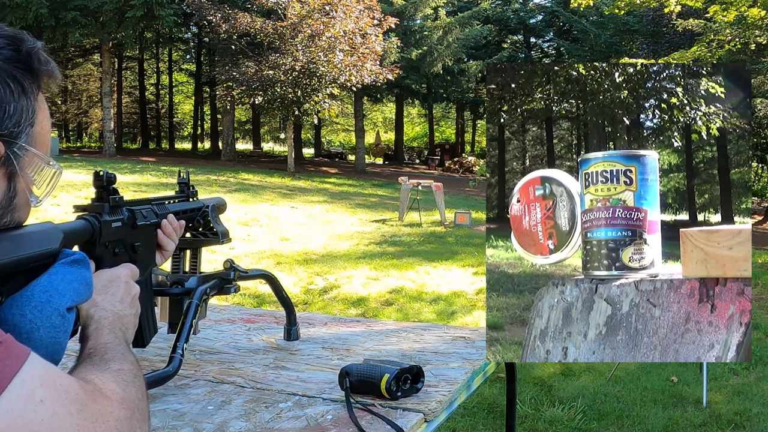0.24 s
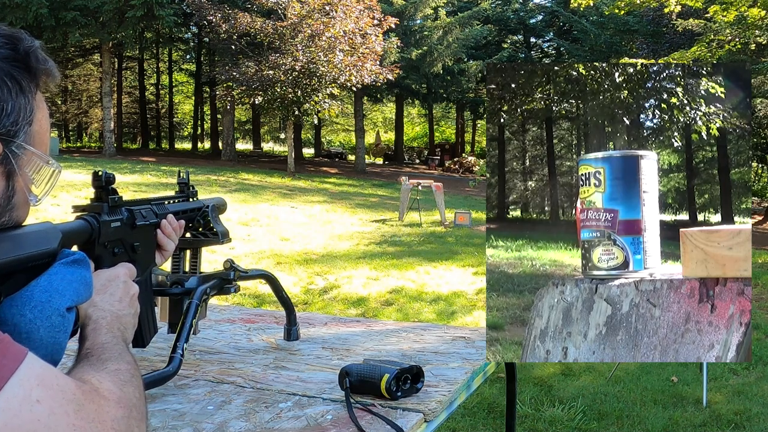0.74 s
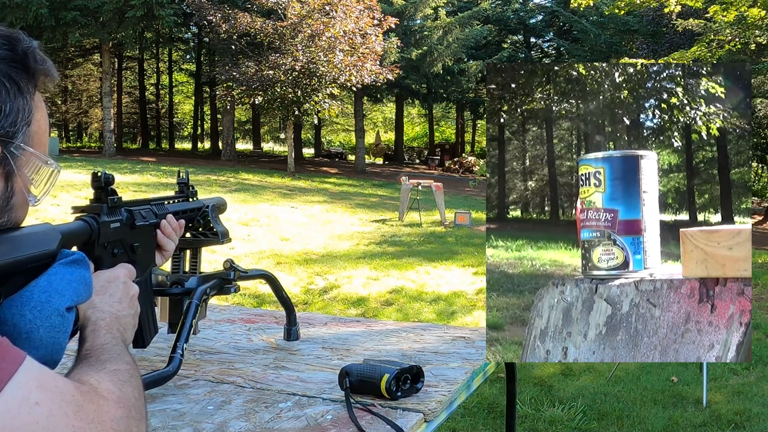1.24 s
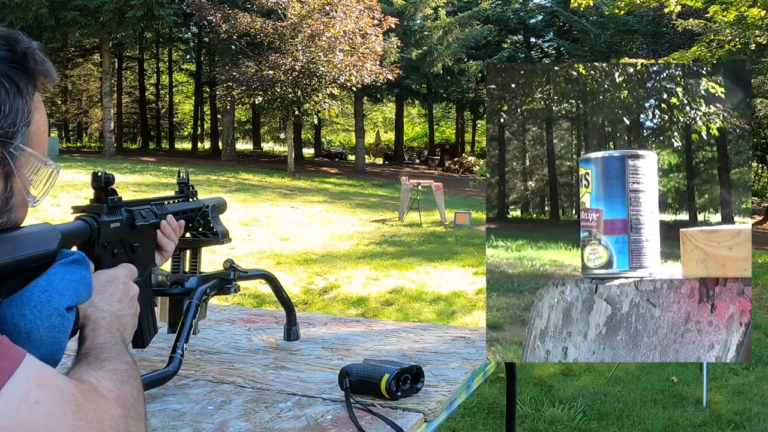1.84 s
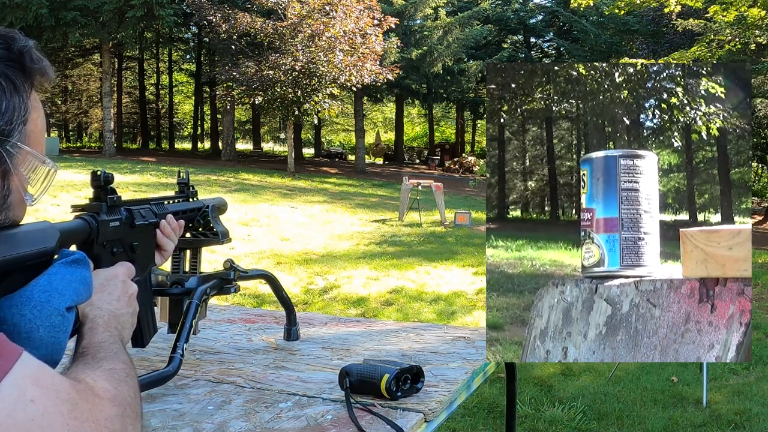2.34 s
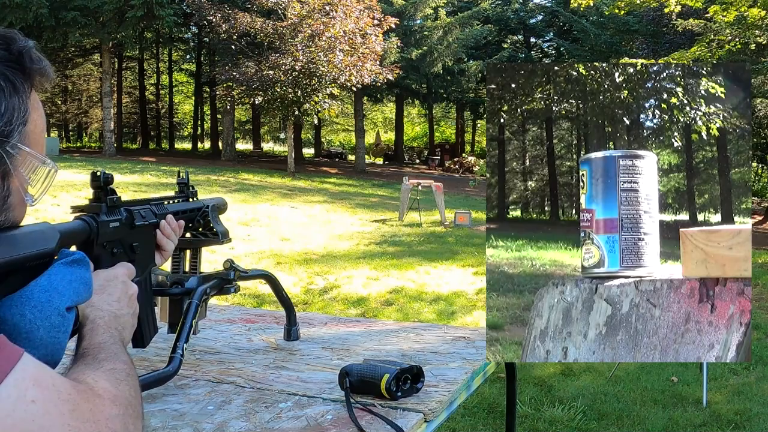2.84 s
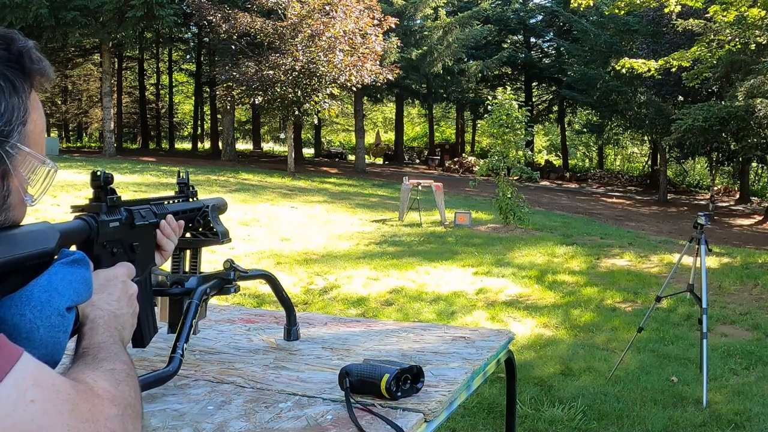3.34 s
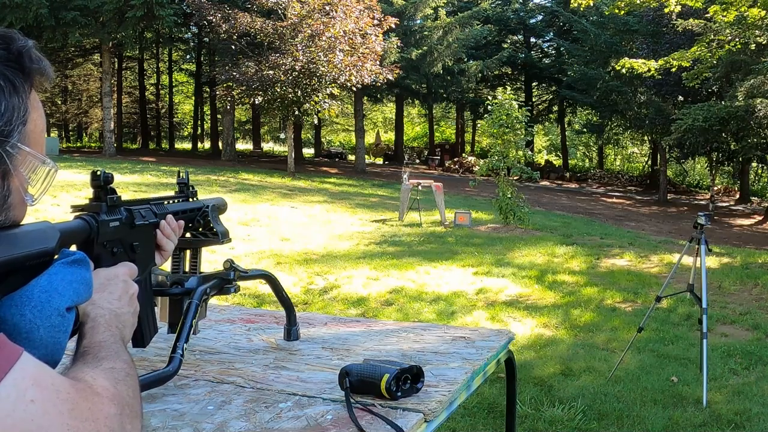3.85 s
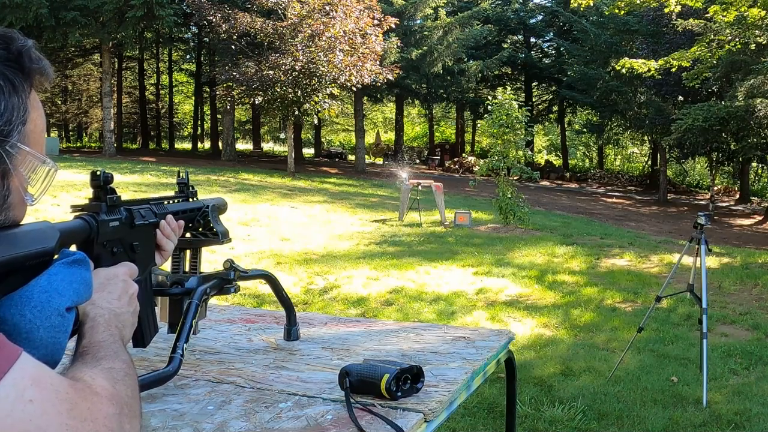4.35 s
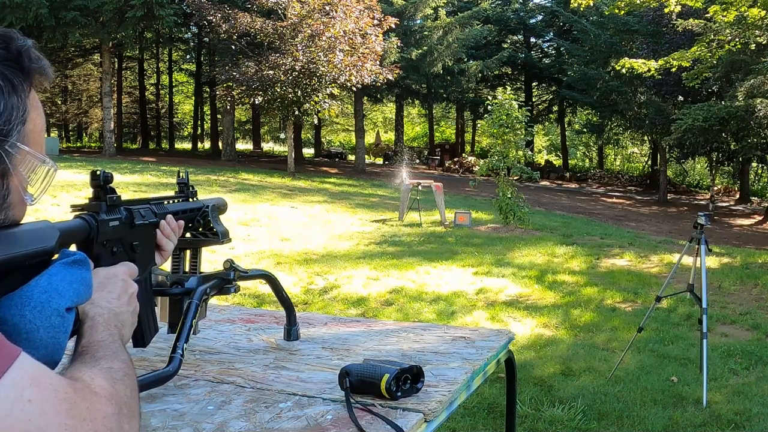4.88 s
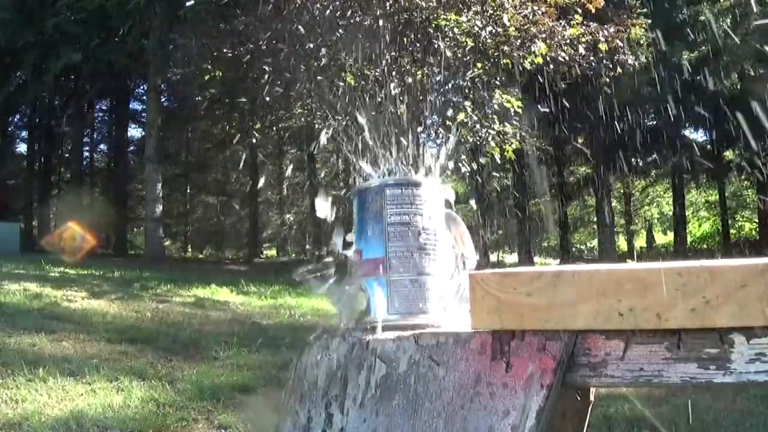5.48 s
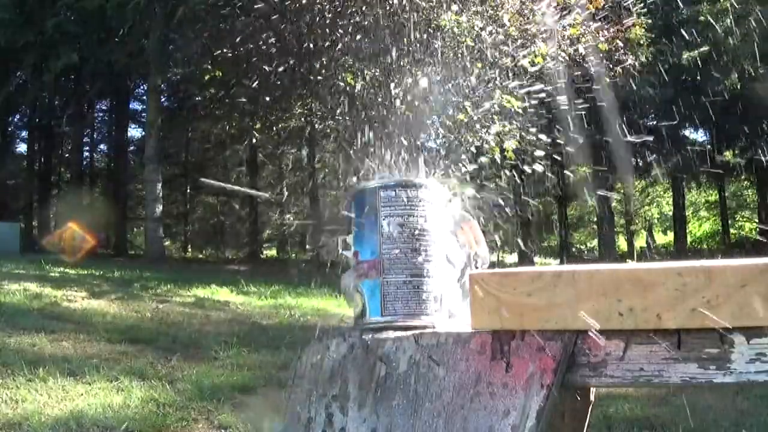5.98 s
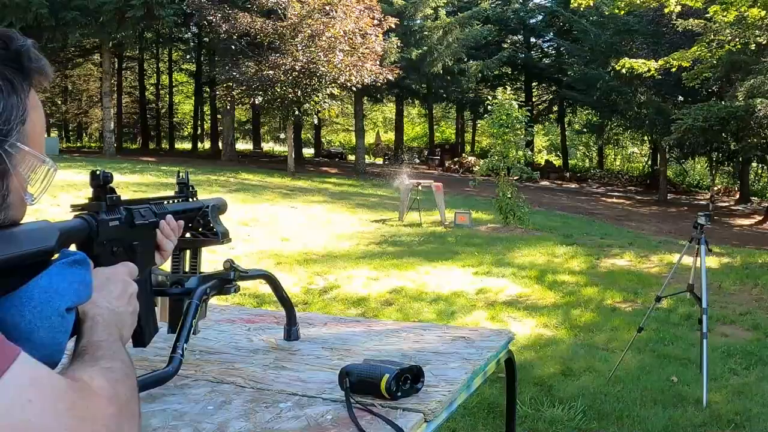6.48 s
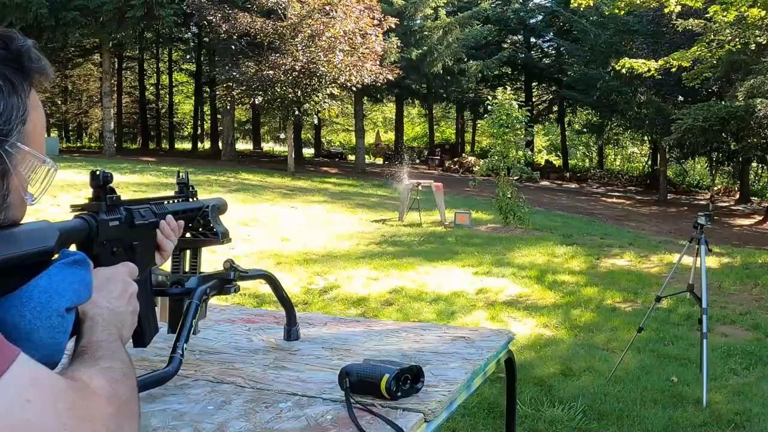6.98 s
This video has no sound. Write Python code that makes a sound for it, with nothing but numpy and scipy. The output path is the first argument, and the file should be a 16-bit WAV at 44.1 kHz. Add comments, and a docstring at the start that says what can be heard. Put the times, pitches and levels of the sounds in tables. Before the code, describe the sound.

A motor-driven air rifle fires two short bursts, then a long rapid string outdoors, gears whirring and pellets ticking on a can.

```python
"""A motor-driven air rifle on a table fires two short bursts, then a long string, at a can across a lawn.
Gears whirr and wind the spring; ten times a second the action clacks or air cracks from the muzzle.
Pellets tick on the food can, which answers with hollow notes. A small metal part pings in a pause,
a cricket trills, and trees scatter the sound back. The last 0.8 s repeats part of the long string."""
import sys
import numpy as np
from scipy import signal
from scipy.fft import rfft, irfft, next_fast_len
from scipy.io import wavfile
from scipy.ndimage import uniform_filter1d, minimum_filter1d

SR = 44100
rng = np.random.default_rng(int(sys.argv[2]) if len(sys.argv) > 2 else 0)


def wav_out(sig):
    """Save sig, one row per channel (or a flat mono array), as 16-bit PCM at SR to the path in sys.argv[1]."""
    wavfile.write(sys.argv[1], SR, np.round(np.clip(np.atleast_2d(sig).T, -1, 1) * 32767).astype(np.int16))


N = 318402
TIME = np.arange(N) / SR


def amp(db):
    """Decibels to gain."""
    return 10 ** (np.asarray(db) / 20)


def unit_rms(x):
    """Scale to rms 1."""
    return x / np.sqrt(np.mean(x ** 2) + 1e-20)


def wobble(smooth_samples, size=N):
    """Smoothed random curve, rms 1."""
    return unit_rms(uniform_filter1d(rng.standard_normal(size), smooth_samples))


def at_hz(table, hz):
    """Interpolate a table over log frequency."""
    knots_hz, values = np.transpose(table)
    return np.interp(np.log(hz + 1), np.log(knots_hz + 1), values)


def add(mix, start_s, sound):
    """Mix a sound in at start_s."""
    part = mix[..., round(start_s * SR):][..., :sound.shape[-1]]
    part += sound[..., :part.shape[-1]]


# Stereo width: freq_hz, side_db
STEREO_WIDTH = [(50, -33), (200, -22.5), (500, -9), (1000, -12), (2500, -10.5), (5000, -8.5), (9000, -16),
                (14000, -40.5)]

def noise(colour, size=N):
    """Stereo noise, rms 1; colour rows are freq_hz, density_db."""
    hz = np.fft.rfftfreq(size, 1 / SR)
    mid, side = rfft(rng.standard_normal((2, size))) * amp(at_hz(colour, hz))
    side = side * amp(at_hz(STEREO_WIDTH, hz))
    return unit_rms(irfft(np.array([mid + side, mid - side]), size))


def burst(colour, rise_s, decay_s, size=8192):
    """Coloured noise that rises to rms 1 and decays."""
    t = np.arange(size) / SR
    envelope = (1 - np.exp(-t / rise_s)) * np.exp(-t / decay_s)
    return noise(colour, size) * envelope / envelope.max()


# Echo colour: freq_hz, gain_db
ECHO_COLOUR = [(100, -9), (400, -6.5), (900, -21), (1350, -8), (2100, -6.5), (4500, -6.5), (9500, -3),
               (14000, -16)]
# Echo decay: freq_hz, t60_s
ECHO_DECAY = [(100, 0.72), (400, 0.51), (2000, 1.21), (4000, 0.94), (8000, 0.64), (14000, 0.6)]

def tree_echo(x, blur_octaves=0.2, build_s=0.019, flutter_db=2.5):
    """Trunks scatter sound into a fluttering wash that builds and decays in each band."""
    hz, t, spectrum = signal.stft(x.mean(0), SR, nperseg=512)
    octave, lag_s = np.log2(hz + 1), t[t < 1]
    blur = np.exp(-0.5 * ((octave[:, None] - octave) / blur_octaves) ** 2)
    power = (blur / blur.sum(1, keepdims=True)) @ abs(spectrum) ** 2
    decay = (amp(-60 * lag_s / at_hz(ECHO_DECAY, hz)[:, None]) * (1 - np.exp(-lag_s / build_s))) ** 2
    tail = np.sqrt(abs(signal.fftconvolve(power, decay / decay.sum(1).mean(), axes=1)[:, :len(t)]))
    wash = signal.stft(rng.standard_normal((2, N)), SR, nperseg=512)[2]
    patches = uniform_filter1d(uniform_filter1d(rng.standard_normal(tail.shape), 3), 25, axis=0)
    flutter = unit_rms(amp(flutter_db * unit_rms(patches)))
    wash = wash / wash.std() * flutter * tail * amp(at_hz(ECHO_COLOUR, hz))[:, None]
    wash[1] *= amp(at_hz(STEREO_WIDTH, hz) + 3.5)[:, None]
    mid, side = signal.istft(wash, SR, nperseg=512)[1][:, :N]
    return np.array([mid + side, mid - side])


# Still air: freq_hz, density_db
AIR_COLOUR = [(20, -27), (68, -2.5), (150, -4), (216, -10.5), (350, -16), (700, -19), (3200, -27),
              (8000, -33.5), (16000, -39)]

def still_air(level_db=-54):
    """Low rumble of air over the lawn."""
    return amp(level_db) * noise(AIR_COLOUR)


def cricket(level_db=-57, pitch_hz=2790, waver_hz=30, pulse_hz=29.9, swell_db=1.5, echo_db=-11):
    """A distant, wavering trill swells and fades, blurred by the trees."""
    swell, pace = wobble(12000), wobble(12000)
    strokes = np.cumsum(pulse_hz * (1 + 0.0082 * pace)) / SR
    pulses = np.maximum(np.sin(2 * np.pi * strokes), 0) ** 4
    cycles = np.cumsum(pitch_hz + waver_hz * wobble(250)) / SR
    trill = amp(level_db + swell_db * swell) * pulses * np.sin(2 * np.pi * cycles)
    return trill + amp(echo_db) * tree_echo(trill[None], blur_octaves=0.02)


# Air puffs: start_s, level_db
PUFFS = [(3.69, -25), (4.101, -22), (4.203, -12.5), (5.024, -27), (5.7398, -23.5), (6.048, -36)]

def air_thumps(push_s=0.0013, settle_s=0.0091, settle_db=-14, rumble_db=-21):
    """A puff pushes the microphone and sucks it back; pressure settles with a short rumble."""
    out, t = np.zeros((2, N)), np.arange(8192) / SR
    u, v = t / push_s, t / settle_s
    push = u * (1 - u / 2) * np.exp(-u)
    settle = v ** 2 * (1 - v / 4) * np.exp(-v)
    puff = push / push.max() + amp(settle_db) * settle / settle.max()
    for start_s, level_db in PUFFS:
        rumble = burst([(25, -6), (80, 10), (160, -16.5), (300, -14.5), (1000, -62)], 0.0032, 0.026)
        add(out, start_s, amp(level_db) * (puff * amp([[0.7], [-0.7]]) + amp(rumble_db) * rumble))
    return out


# Small metal part: pitch_hz, level_db, t60_s
PING_MODES = [(367, -6.5, 0.74), (1933, -4, 0.98), (2050, -1, 0.6), (2519, -1, 0.69), (2879, 1, 0.35),
              (2940, 1.5, .9), (3360, 1, 0.5), (3380, 9.5, 0.17), (3890, 13.5, 0.14), (4092, 0.5, 0.63),
              (4340, -1.5, 0.63), (5145, -5, 0.76), (5263, 4, 0.46), (5900, 1, 0.54), (6180, 2, 0.65),
              (6900, -0.5, 0.68), (7475, 2.5, 0.55), (7838, 0, 0.76), (8830, -4, 0.42), (10200, -3, 0.48)]

def metal_ping(start_s=2.592, ring_db=-42, clash_db=-28.5):
    """A struck part on the right: bright clash, then ringing modes, the higher ones more blurred."""
    out, t = np.zeros((2, N)), np.arange(SR) / SR
    for pitch_hz, level_db, t60_s in PING_MODES:
        linewidth_hz = (pitch_hz / 2000) ** 2
        wander = np.cumsum(rng.standard_normal(SR)) * np.sqrt(2 * np.pi * linewidth_hz / SR)
        phase = rng.uniform(0, 2 * np.pi) + wander + 0.22 * rng.standard_normal((2, 1))
        envelope = amp(ring_db + level_db - 60 * t / t60_s)
        add(out, start_s, envelope * np.sin(2 * np.pi * pitch_hz * t + phase))
    clash_colour = [(1200, -27), (2200, -9.5), (3900, -2.5), (7500, -4.5), (10500, -9.5), (15000, -33)]
    add(out, start_s, amp(clash_db) * burst(clash_colour, 0.0003, 0.031))
    return out * amp([[-1.3], [1.3]])


# Hiss swells: peak_s, level_db, half_width_s
HISS_SWELLS = [(.145, -31, 0.022), (0.173, -26, 0.0036), (0.286, -24.5, 0.0039), (0.451, -23, 0.011),
               (.495, -26, 0.015), (1.784, -27, 0.0088), (1.945, -27.5, 0.021), (1.998, -25, 0.01),
               (4.12, -24, 0.00714), (4.256, -25, 0.019), (5.565, -25.5, 0.024), (6.101, -24, 0.014)]
# Hiss: freq_hz, density_db
HISS_COLOUR = [(300, -31), (1500, -0.5), (3000, 4), (6000, 7), (9500, 4), (12000, -4), (16000, -19.5)]

def hiss(grain_db=2.5):
    """Brief swells of grainy hiss."""
    envelope = sum(amp(level_db) * np.exp(-0.5 * ((TIME - peak_s) / half_width_s) ** 2)
                   for peak_s, level_db, half_width_s in HISS_SWELLS)
    grain = unit_rms(amp(grain_db * wobble(40)))
    return envelope * grain * noise(HISS_COLOUR)


# Loud scrap ticks: start_s, level_db
LOUD_SCRAPS = [(3.707, -16), (3.7133, -13.5), (3.7243, -18.5), (3.8573, -13), (3.8621, -17), (3.8683, -16),
               (3.8746, -13), (4.1424, -13), (4.3143, -28), (4.7253, -17.5), (4.9243, -20.5),
               (5.5534, -13.5)]

def scraps(faint_count=200, faint_db=-35, spread_db=7, lag_s=0.027):
    """Flying scraps tick: a few loud, many faint after the shots of the long string."""
    out, long_string, faint = np.zeros((2, N)), SHOT_EVENTS[2:], []
    colour = [(400, -19), (4000, -14), (6500, -2.5), (10500, 12), (13000, 2.5), (16000, -12)]
    for which, late, loud in rng.random((faint_count, 3)):
        shot_s = long_string[int(which * len(long_string))][0]
        delay_s = lag_s * (0.5 - np.log(1 - late))
        faint.append((shot_s + delay_s, faint_db + spread_db * min(-np.log(1 - loud), 3)))
    for start_s, level_db in LOUD_SCRAPS + faint:
        add(out, start_s, amp(level_db) * burst(colour, 0.00005, 0.00062, size=512))
    return out


# Low can modes: pitch_hz, level_re_boom_db
CAN_MODES = [(226, -6), (305, 1.5), (365, -2), (465, -3), (739, -3)]
# Loud can notes: peak_s, level_db, pitch_hz, half_width_s
LOUD_NOTES = [(.475, -38, 348, .022), (.52, -36.5, 923, 0.014), (1.948, -24, 469, 0.0074),
              (1.95, -29, 341.7, 0.015), (3.737, -17.5, 309.6, 0.0046), (3.845, -24.5, 338, 0.0052),
              (3.935, -23.5, 303, 0.0091), (4.029, -20.5, 442.5, 0.0032), (4.053, -23.5, 950, .015),
              (4.13, -25.5, 964, 0.0076), (4.1806, -16.5, 434.6, 0.0023), (4.35, -31.5, 920, 0.027),
              (4.412, -30.5, 1125, 0.0044), (4.671, -12.5, 367.4, 0.003), (4.703, -20, 518, 0.0027),
              (4.8397, -25.5, 1107, 0.0043), (4.996, -19, 335.5, 0.003), (5.24, -20.5, 524, 0.0036),
              (5.311, -17, 340.6, 0.0038), (5.406, -23.5, 471, 0.0056), (5.5025, -20, 335.5, 0.0053)]

def can_notes(delay_s=0.034, scatter_s=0.01087, swell_s=0.0085, detune=0.0493,
              rise_per_s=1.308, wander_hz=9, thud_db=-10):
    """The struck can swells with hollow, rising notes: soft after each shot, loud ones with a thud."""
    out, t = np.zeros((2, N)), np.arange(-4096, 4096) / SR
    soft_notes = []
    for shot_s, _, _ in SHOT_EVENTS:
        boom_db = np.interp(shot_s, *np.transpose(BOOM_LEVELS))
        for pitch_hz, mode_db in CAN_MODES:
            late, sharp = rng.standard_normal(2)
            peak_s = shot_s + delay_s + scatter_s * late
            soft_notes.append((peak_s, boom_db + mode_db, pitch_hz * (1 + detune * sharp), swell_s))
    for peak_s, level_db, pitch_hz, half_width_s in soft_notes + LOUD_NOTES:
        glide_hz = pitch_hz * (1 + rise_per_s * t) + wander_hz * wobble(150, len(t))
        phase = 2 * np.pi * np.cumsum(glide_hz) / SR + 0.45 * rng.standard_normal((2, 1))
        envelope = amp(level_db) / np.cosh(np.clip(1.36 * t / half_width_s, -20, 20))
        add(out, peak_s + t[0], envelope * np.sin(phase) * amp([[-0.8], [0.8]]))
    for peak_s, level_db, _, half_width_s in LOUD_NOTES:
        add(out, peak_s - half_width_s, amp(level_db + thud_db) * burst(BOOM_COLOUR, 0.0035, 0.014))
    return out


# Clangs: start_s, level_db, length_ratio, pitch_ratio, tilt_db_per_octave
CLANG_EVENTS = [(.396, -23.5, 1.6, 1, 1), (1.899, -31.5, 1.4, 1.05, 13), (4.919, -12, 0.22, 1.05, -10.5),
                (5.843, -22, 0.36, 1.1, -0.5), (5.947, -27.5, 0.99, .94, -9.5),
                (6.0493, -16.5, 0.31, 1.2, -1), (6.15, -14, 0.39, 0.94, -7.5)]
# Thin metal: pitch_hz, level_db, t60_s
CLANG_MODES = [(1250, 3.5, 0.068), (1418, -1.5, 0.045), (1995, -2.5, 0.087), (2970, -7.5, 0.095)]

def clangs():
    """A few shots set thin metal ringing, each with its own pitch and brightness."""
    out, t = np.zeros((2, N)), np.arange(16384) / SR
    for start_s, level_db, length_ratio, pitch_ratio, tilt_db_per_octave in CLANG_EVENTS:
        for pitch_hz, mode_db, t60_s in CLANG_MODES:
            tilt_db = tilt_db_per_octave * np.log2(pitch_hz / CLANG_MODES[0][0])
            envelope = amp(level_db + mode_db + tilt_db - 60 * t / (t60_s * length_ratio))
            add(out, start_s, envelope * np.sin(2 * np.pi * pitch_hz * pitch_ratio * t))
    return out


# Sharp ticks with duller taps: start_s, tick_db, tap_db
IMPACT_EVENTS = [(0.1774, -6, -12.5), (0.291, -11, -15), (.439, -17, -36), (0.5012, -13, -24),
                 (1.792, -29.5, -26.5), (2.0032, -18.5, -42), (3.586, -26.5, -12), (3.9540, -22.5, -30),
                 (4.153, -12, -20), (4.3656, -18.5, -31.5), (4.445, -15.5, -24.5), (4.5218, -15, -38),
                 (4.635, -16, -27), (4.862, -14, -26), (4.973, -12.5, -32), (5.0368, -12, -20),
                 (5.0465, -13, -33.5), (5.137, -13.5, -23), (5.1624, -15, -14.5), (5.1998, -13, -38),
                 (5.229, -15, -21), (5.2664, -14, -32.5), (5.3103, -14.5, -21.5), (5.4399, -16, -23),
                 (5.5993, -17.5, -31.5), (5.652, -37, -21), (5.6727, -15.5, -28), (5.785, -15.5, -18.5),
                 (5.856, -17.5, -27), (6.011, -17, -26)]
# Bright tick, dull tap: freq_hz, density_db
TICK_COLOUR = [(400, -20), (2000, -13.5), (4000, 1), (6500, 7), (9500, 5), (12000, -7.5), (16000, -18.5)]
TAP_COLOUR = [(150, -23), (600, -24), (1200, 2.5), (2600, -1.5), (4500, -5), (10000, -32.5)]

def impacts():
    """Sharp ticks and duller taps: pellets on the can, and the knock of the long string's first shot."""
    out = np.zeros((2, N))
    for start_s, tick_db, tap_db in IMPACT_EVENTS:
        tick = burst(TICK_COLOUR, 0.0001, 0.00076)
        tail = amp(-16) * burst(TICK_COLOUR, 0.00079, 0.0033)
        add(out, start_s, amp(tick_db + 1.5) * (tick + tail))
        add(out, start_s, amp(tap_db) * burst(TAP_COLOUR, 0.00022, 0.0011))
    return out


# Taps on the rifle: start_s, level_db
RIFLE_TAPS = [(1.107, -33.5), (2.3911, -46)]

def rifle_taps():
    """Light taps on the rifle between bursts."""
    out = np.zeros((2, N))
    for start_s, level_db in RIFLE_TAPS:
        add(out, start_s, amp(level_db) * burst(TICK_COLOUR, 0.000186, 0.0012))
    return out


def gear_squeal(peak_s=1.688, half_width_s=0.016, pitch_hz=2420, level_db=-40, droop_hz=50):
    """The gears squeal as the second burst spins up."""
    u = np.clip((TIME - peak_s) / half_width_s, -3, 3)
    cycles = np.cumsum(pitch_hz - droop_hz * u ** 2) / SR
    return amp(level_db) * np.exp(-u ** 4) * np.sin(2 * np.pi * cycles)


# Trigger pulls: on_s, off_s, level_db
MOTOR_RUNS = [(0.079, 0.334, -37.5), (1.638, 1.862, -38.5), (3.42, 6.42, -37)]
# Gear rasp: freq_hz, density_db
RASP_COLOUR = [(60, -27.5), (350, -18.5), (600, 4), (1200, 5.5), (2000, 0), (3000, 5.5), (4200, 2),
               (6500, 4), (10000, 1), (12000, -12.5), (16000, -19)]

def gears(unloaded_hz=1000, sag=0.38, spin_up_s=0.012, attack_s=0.033, coast_s=0.1, tooth_db=3.5,
          whine_db=-16, strain_db=4.5, whine_strain_db=5, strain_peak_s=0.12, strain_width_s=0.13):
    """Teeth rasp and whine; the motor strains early in a run and slows each time it winds the spring."""
    releases_s = np.sort([row[0] for row in SHOT_EVENTS + CLACK_EVENTS])
    winding = np.interp(TIME, releases_s, np.arange(len(releases_s))) % 1
    envelope, speed, strain = np.zeros((3, N))
    for on_s, off_s, level_db in MOTOR_RUNS:
        age_s = np.maximum(TIME - on_s, 0)
        coast = np.exp(-np.maximum(TIME - off_s, 0) / coast_s)
        envelope += amp(level_db) * (1 - np.exp(-age_s / attack_s)) * coast
        strain += np.exp(-((age_s - strain_peak_s) / strain_width_s) ** 2) * (age_s > 0)
        speed = np.where(age_s > 0, 1 - np.exp(-age_s / spin_up_s), speed)
    mesh_hz = unloaded_hz * speed * (1 - sag * uniform_filter1d(winding, 600))
    phase = 2 * np.pi * np.cumsum(mesh_hz * (1 + 0.01664 * wobble(200))) / SR
    harmonics_db = [6, -3, -15.5, 6, -14.5]
    whine = unit_rms(sum(amp(db) * np.sin(k * phase) for k, db in enumerate(harmonics_db, 1)))
    teeth = unit_rms(amp(tooth_db * (np.sin(phase) + wobble(30))))
    rasp = teeth * noise(RASP_COLOUR)
    return envelope * amp(strain_db * strain) * (rasp + amp(whine_db + whine_strain_db * strain) * whine)


# Action cycles without a crack: start_s, clatter_db, knock_db
CLACK_EVENTS = [(0.1031, -15, -27), (0.2085, -16, -28), (.3120, -17, -27), (1.711, -19.5, -27),
                (1.8131, -17, -28.5), (3.5063, -17.5, -26.5), (6.1735, -21.5, -25.5), (6.2759, -22, -25.5),
                (6.377, -23.5, -23.5)]
# Action clatter, action knock: freq_hz, density_db
CLATTER_COLOUR = [(400, -11), (2000, -26.5), (4500, -8), (6300, 5), (9000, 6.5), (10500, 1.5), (12000, -27),
                  (16000, -40)]
ACTION_COLOUR = [(50, -16), (130, 4.5), (330, -5.5), (540, 6), (800, -7), (1300, 5.5), (2200, -5),
                 (5000, -20)]

def action_clacks(stock_hz=540, stock_db=1, hum_s=0.0049):
    """The action chatters three times and knocks the stock, which hums briefly."""
    out, t = np.zeros((2, N)), np.arange(4096) / SR
    hum = t / hum_s * np.exp(-t / hum_s) * np.sin(2 * np.pi * stock_hz * t)
    for start_s, clatter_db, knock_db in CLACK_EVENTS:
        for offset_s, hit_db in [(-0.003, -6), (0, -1), (0.0028, 3)]:
            add(out, start_s + offset_s, amp(clatter_db + hit_db) * burst(CLATTER_COLOUR, 0.00028, 0.0013))
        add(out, start_s - 0.002, amp(knock_db) * burst(ACTION_COLOUR, 0.0032, 0.0053))
        add(out, start_s + 0.003, amp(knock_db + stock_db) * hum)
    return out


# Shots: start_s, crack_db, blast_db
SHOT_EVENTS = [(0.3954, -6, -7.5), (1.8971, -7, -9), (3.5857, -3.5, -15.5), (3.691, -11.5, -17),
               (3.792, -6, -30), (3.8956, -12.5, -34), (3.997, -7.5, -24), (4.099, -12, -19.5),
               (4.2013, -17.5, -19), (4.304, -15, -24), (4.405, -9, -23.5), (4.51, -15, -25),
               (4.6116, -7.5, -24), (4.713, -11.5, -21), (4.815, -15.5, -22.5), (4.9171, -5.5, -15),
               (5.021, -13, -18), (5.122, -17, -15), (5.2274, -9.5, -26.5), (5.3297, -19.5, -14.5),
               (5.4317, -16.5, -18.5), (5.5325, -12.5, -17.5), (5.636, -14.5, -15.5), (5.7412, -8, -25),
               (5.8427, -14.5, -23), (5.9436, -6.5, -37), (6.0474, -17.5, -16.5), (6.149, -7.5, -23.5)]
# Piston rattle, muzzle crack, air blast, frame knock, hollow boom: freq_hz, density_db
RATTLE_COLOUR = [(300, -19.5), (1500, -0.5), (3000, 7), (6000, 5), (9500, 7.5), (12000, 1.5),
                 (16000, -12.5)]
CRACK_COLOUR = [(300, -27.5), (1500, -6), (3000, -3), (5000, -5), (8000, 1), (10500, 2.5), (13000, -7),
                (16000, -23.5)]
BLAST_COLOUR = [(300, -21.5), (1500, -19.5), (2800, -2), (5000, -1), (7000, -1), (10000, 2.5),
                (12500, -11.5), (16000, -20.5)]
KNOCK_COLOUR = [(80, -16.5), (250, -11.5), (550, 4), (1000, 3.5), (1500, 3), (2200, -2), (3500, -14),
                (8000, -40.5)]
BOOM_COLOUR = [(60, -29.5), (150, -9), (240, -8), (310, 1), (480, -2.5), (650, -7.5), (1000, -14),
               (1800, -22.5), (4000, -46)]
# Frame and spring: pitch_hz, level_db, t60_s
FRAME_MODES = [(350, -42.5, 0.58), (512.6, -40.5, 0.25), (937, -38, 0.37), (1442, -38, 0.25),
               (2056, -34, 0.12), (3097, -38, .35)]
# Strength of boom and frame ring: time_s, level_db
BOOM_LEVELS = [(.4, -44), (1.9, -30.5), (3.59, -35), (3.69, -31.5), (4.1, -30.5), (4.3, -38), (4.61, -26),
               (4.82, -31.5), (5.12, -33), (5.43, -28.5), (5.7, -43), (5.9, -34.5), (6.15, -49)]
RING_LEVELS = [(1.9, -1), (3.6, 7.5), (4.1, 1.5), (4.5, -9), (6.15, -2)]

def shots(rattle_db=-25, knock_db=-26, ring_spread_db=2, catch_db=-31, clatter_db=-33):
    """The piston rattles free, air cracks from the muzzle, the frame knocks and rings, a boom follows."""
    out, t = np.zeros((2, N)), np.arange(16384) / SR
    for start_s, crack_db, blast_db in SHOT_EVENTS:
        boom_db = np.interp(start_s, *np.transpose(BOOM_LEVELS))
        ring_db = np.interp(start_s, *np.transpose(RING_LEVELS))
        rattle = burst(RATTLE_COLOUR, 0.0013, 0.0065, size=2048)[:, ::-1]  # swells into the shot
        add(out, start_s - 0.0016 - rattle.shape[1] / SR, amp(rattle_db) * rattle)
        add(out, start_s, amp(crack_db + 6) * burst(CRACK_COLOUR, 0.0001, 0.00072, size=1024))
        add(out, start_s + 0.0011, amp(blast_db) * burst(BLAST_COLOUR, 0.00096, 0.0034, size=2048))
        add(out, start_s, amp(knock_db) * burst(KNOCK_COLOUR, 0.00054, 0.011))
        add(out, start_s + 0.00411, amp(boom_db) * burst(BOOM_COLOUR, 0.029, 0.028))
        for pitch_hz, mode_db, t60_s in FRAME_MODES:
            envelope = amp(ring_db + mode_db + ring_spread_db * rng.standard_normal() - 60 * t / t60_s)
            add(out, start_s, envelope * np.sin(2 * np.pi * pitch_hz * rng.uniform(0.98, 1.02) * t))
        # piston caught a quarter cycle later; the mechanism clatters
        add(out, start_s + 0.026, amp(catch_db) * burst(TICK_COLOUR, 0.0038, 0.003))
        add(out, start_s + rng.uniform(0.026, 0.05), amp(clatter_db) * burst(TAP_COLOUR, 0.0012, 0.0052))
    return out


# Left port's phase lead: freq_hz, lead_rad
PORT_LEAD = [(20, 0.583), (300, 0.12), (1300, 0.65), (3200, 0.47), (7000, 0.42), (16000, 0)]

def microphone_ports(x):
    """Two ports hear the same wave slightly out of step."""
    size = next_fast_len(N)
    lead_rad = at_hz(PORT_LEAD, np.fft.rfftfreq(size, 1 / SR))
    return irfft(rfft(x, size) * np.exp(0.5j * np.array([lead_rad, -lead_rad])), size)[:, :N]


def scene(echo_db=-6, ping_echo_db=-11, slap_s=0.097, slap_db=-14):
    """Rifle, can and ping with their echoes, over the lawn's air and cricket."""
    shooting = shots() + clangs() + action_clacks() + impacts() + rifle_taps()
    shooting += scraps() + hiss() + gears() + gear_squeal() + can_notes()
    ping = metal_ping()
    echoes = amp(echo_db) * tree_echo(shooting)
    echoes += amp(ping_echo_db) * tree_echo(ping, blur_octaves=0.016, build_s=0.022)
    add(echoes, slap_s, amp(slap_db) * ping[::-1])  # slap off the tree line, sides swapped
    return microphone_ports(shooting + ping + echoes + air_thumps() + still_air() + cricket())


def record(dry, threshold_db=-1.5, recover_db_per_s=1500, clip_db=-4,
           repeat_start_s=6.415, repeat_lag_s=2.23556, cutoff_hz=16200):
    """Look-ahead limiter, soft clip, a repeat of part of the long string, low-pass."""
    peak_ahead = -minimum_filter1d(-abs(dry).max(0), size=111, origin=-50)
    over_db = np.maximum(20 * np.log10(peak_ahead + 1e-9) - threshold_db, 0)
    recovery_db = TIME * recover_db_per_s
    duck_db = np.maximum.accumulate(over_db + recovery_db) - recovery_db
    limited = dry / amp(uniform_filter1d(duck_db, 15))
    clipped = amp(clip_db) * np.tanh(limited / amp(clip_db))
    delayed = np.roll(clipped, round(repeat_lag_s * SR), axis=1)
    joined = np.where(TIME < repeat_start_s, clipped, delayed)
    lowpass = signal.firwin(511, cutoff_hz, window=("kaiser", 9), fs=SR)
    return signal.oaconvolve(joined, lowpass[None], "same")


dry = scene()
out = record(dry)
wav_out(out)
```